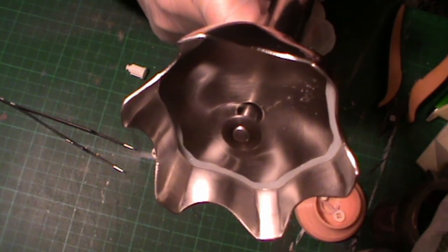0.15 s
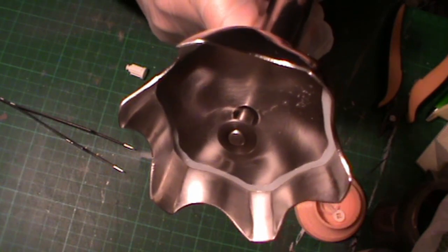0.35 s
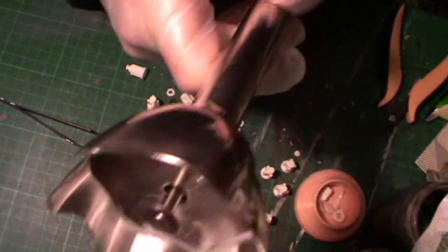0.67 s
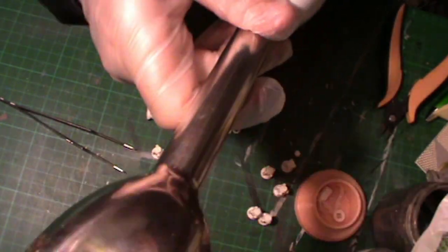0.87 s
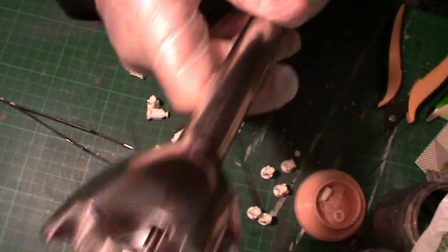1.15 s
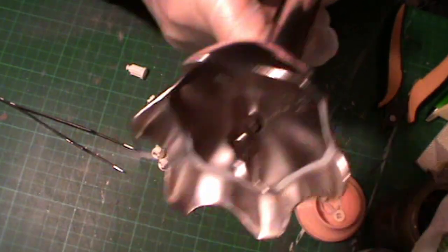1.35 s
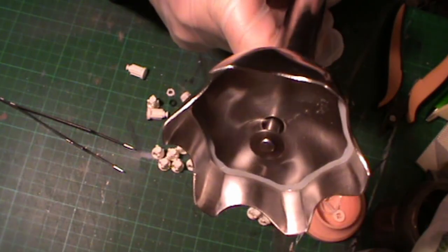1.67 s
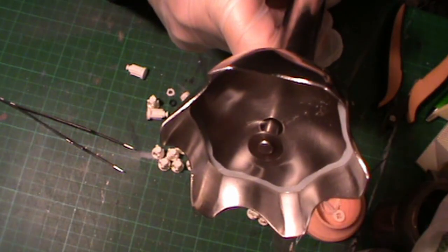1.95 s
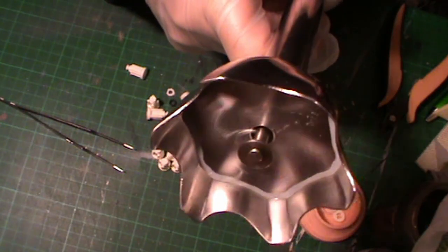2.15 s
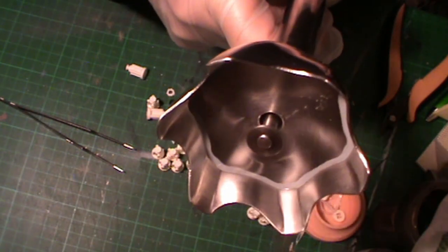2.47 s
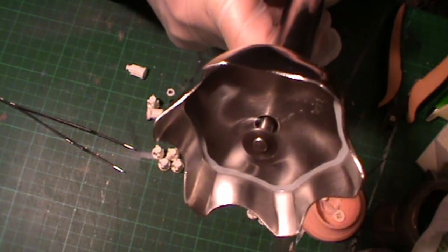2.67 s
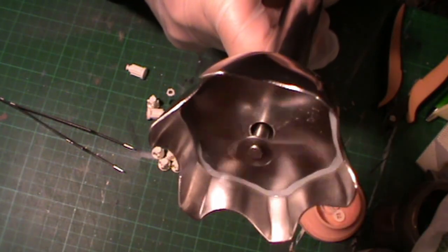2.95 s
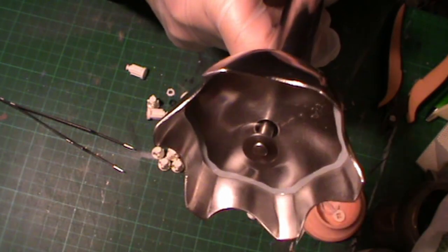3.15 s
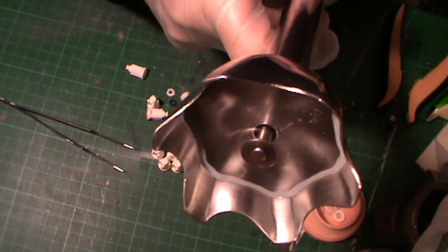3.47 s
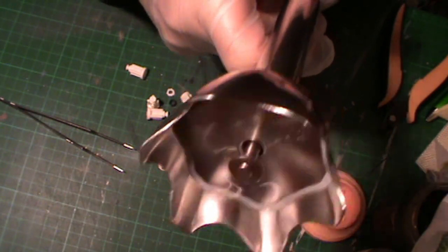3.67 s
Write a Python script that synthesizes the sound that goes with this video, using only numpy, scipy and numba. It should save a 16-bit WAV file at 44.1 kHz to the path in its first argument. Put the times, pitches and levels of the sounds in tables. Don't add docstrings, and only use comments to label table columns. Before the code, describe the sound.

A hand blender close to the microphone runs loudly at full speed, glides down in pitch and stops with a soft thud, then gives three short, rattly low-speed pulses in a small quiet room.

```python
import sys
import numpy as np
from scipy import signal
from scipy.fft import rfft, irfft
from scipy.io import wavfile
from scipy.ndimage import uniform_filter1d
from numba import njit

SR = 44100
rng = np.random.default_rng(int(sys.argv[2]) if len(sys.argv) > 2 else 0)


def log_audio(samples):
    frames = np.atleast_2d(samples).T
    limited = np.clip(frames, -1, 1)
    pcm = np.round(limited * 32767).astype(np.int16)
    wavfile.write(sys.argv[1], SR, pcm)


def gain_from_db(level_db):
    decades = np.asarray(level_db, float) / 20
    return 10 ** decades


N = 167580
T = np.arange(N) / SR

# on_s, off_s, shaft_hz, moment_of_one_knock_s, knock_db
PRESSES = [
    (1.7, 2.105, 50.23, 1.9925, 0),
    (2.411, 2.765, 50.65, 2.6268, -4),
    (3.153, 3.679, 51.13, 3.539, -3),
]


def level(x, db):
    return x * gain_from_db(db) / np.sqrt(np.mean(x ** 2))


@njit
def svf(x, hz, width):
    y, b, l = np.empty(len(x)), 0., 0.
    for i in range(len(x)):
        g, k = np.tan(np.pi * hz[i] / SR), width[i] / hz[i]
        v = (b + g * (x[i] - l)) / (1 + g * (g + k))
        b, l, y[i] = 2 * v - b, l + 2 * g * v, k * v
    return y


def band(x, hz, width):
    return svf(x, np.clip(hz + 0 * T, 10, .45 * SR), np.maximum(width + 0 * T, 1))


def hiss():
    return rng.standard_normal(N)


def walk(rate):
    k = int(SR / rate)
    steps = np.repeat(rng.standard_normal(N // k + 1), k)
    return 1.4 * uniform_filter1d(uniform_filter1d(steps, k), k)[:N]


def coloured(table):
    hz, db = np.array(table).T
    f = np.arange(N // 2 + 1) * SR / N + 1
    gain = gain_from_db(np.interp(np.log(f), np.log(hz), db, left=-60))
    return level(irfft(rfft(hiss()) * gain, N), 0)


def bump(centre_s, half_width_s):
    return np.exp(-((T - centre_s) / half_width_s) ** 2)


def motor():
    # shaft_hz, level_db
    effort = [(8, -64), (25, -42), (50, -37.5), (100, -29), (150, -25), (220, -17)]
    speed, turns, power, knock = shaft()
    octave = np.log2(np.maximum(speed, 1) / 220)
    press = np.searchsorted([p[0] for p in PRESSES], T)
    hz, db = np.array(effort).T
    loud = gain_from_db(np.interp(np.log(speed + 1), np.log(hz), db, left=-90))
    driven = commutator_tones(speed, turns, power, octave, press)
    driven = driven + commutator_ticks(speed, turns, octave)
    driven = driven + shaft_knocks(speed, turns, power, knock, octave, press)
    driven = driven + brush_hiss(power, octave) + bar_noise(speed, octave)
    return unbalance(speed, turns, octave) + mains_buzz(power) + loud * driven


def shaft():
    # time_s, shaft_hz
    coast = [(0, 193), (.116, 218), (.26, 220.5), (.476, 153.5), (.62, 119.5), (.78, 85.4), (.97, 54),
             (1.1, 36), (1.2, 23)]
    fast_stop_s, fast_off_s = 1.29, .27
    spin_up_s, coast_hz_per_s = .011, 128
    release_drop_hz, release_s = 6, .018
    at, hz = np.array(coast).T
    speed = np.interp(T, [*at, fast_stop_s], [*hz, 0])
    power = 1. * (T < fast_off_s)
    knock = np.full(N, gain_from_db(-3.0))
    for on, off, top, _, db in PRESSES:
        up = top * (1 - np.exp(-np.maximum(T - on, 0) / spin_up_s))
        since = np.maximum(T - off, 0)
        down = top - release_drop_hz * (1 - np.exp(-since / release_s)) - coast_hz_per_s * since
        speed = np.where(T > on, np.clip(np.minimum(up, down), 0, None), speed)
        power = power + (T > on) * (T < off)
        knock = np.where(T > on, gain_from_db(db), knock)
    turns = np.cumsum(speed) / SR
    for on, _, _, knock_s, _ in PRESSES:
        turns = np.where(T > on, turns - np.interp(knock_s, T, turns), turns)
    return speed, turns, uniform_filter1d(power, size=200), knock


def tone(multiple, turns):
    return np.sin(2 * np.pi * (multiple * turns + rng.random())) * np.sqrt(2)


def commutator_tones(speed, turns, power, octave, press):
    bar_multiples = [12, 24, 48, 72, 96, 120]
    # fast_run_db, press_1_db, press_2_db, press_3_db, powered_lift_db
    bar_levels = [(-22, -19, -19, -20, -2), (-19, -16, -16, -16, 1), (-26, -30, -29, -26, 3),
                  (-27, -23, -22, -20, -6), (-33, -26, -26, -24, -3), (-38, -29, -29, -25, 0)]
    out = np.zeros(N)
    for k, db in zip(bar_multiples, bar_levels):
        hz = k * speed
        gain_db = np.array(db)[press] + db[-1] * power + 1.8 * walk(28)
        gain_db = gain_db - 22 * np.maximum(octave + .8, 0)
        low_cut = 1 + (np.where(k > 12, 680, 420) / (hz + 1)) ** 8
        out += gain_from_db(gain_db) * tone(k, turns) * (hz < 11000) * housing(hz) / low_cut
    return out


def housing(hz):
    # centre_hz, width_hz, lift_db
    resonances = [(590, 100, 4), (830, 150, 10), (1220, 200, 10), (1800, 350, -4), (2300, 300, 9),
                  (2800, 260, 10), (3350, 250, -7), (4800, 2000, 9)]
    lift = sum(db / (1 + (2 * (hz - f) / w) ** 2) for f, w, db in resonances)
    return gain_from_db(lift) / (1 + (330 / (hz + 1)) ** 2)


def unbalance(speed, turns, octave):
    shakes = [-25.5, -36.5, -36, -34.5, -43, -34, -35, -41, -42, -39, -38]
    out = np.zeros(N)
    for k, db in enumerate(shakes, start=1):
        gain_db = db + flare(k) + 6 * octave * (2 < k < 10) + min(k, 1.6) * walk(20)
        out += gain_from_db(gain_db) * tone(k, turns) / (1 + (68 / (k * speed + 1)) ** 6)
    return gain_from_db(17 * octave) * out


def flare(multiple):
    # centre_s, half_width_s, shaft_multiple, swell_db
    swells = [(0, .05, 2, -12), (0, .05, 3, -9), (0, .06, 4, -11), (0, .07, 6, -9), (.05, .05, 7, 5),
              (.205, .045, 6, 11), (.255, .045, 4, 8), (.43, .05, 3, 5), (.3, .05, 6, -5), (.2, .05, 9, 6),
              (.33, .03, 3, -7), (.36, .045, 5, 14), (.4, .04, 8, 5), (.46, .04, 9, 9), (.51, .04, 6, 4),
              (.56, .07, 10, 9), (.61, .05, 11, 8), (.58, .025, 1, -5), (.68, .03, 1, 2), (.6, .12, 3, -6),
              (.8, .04, 11, 13), (.78, .03, 10, 12), (.92, .07, 11, 14)]
    return sum(db * bump(s, w) for s, w, k, db in swells if k == multiple)


def commutator_ticks(speed, turns, octave):
    tick = level(bell(ticks(turns, count=72, scatter_db=6.0, pattern_db=1.5)), -3.5)
    even = 1 / np.sqrt(np.maximum(speed, 12) / 50)
    return tick * even * gain_from_db(-3.0 * np.maximum(octave + 2, 0))


def passing(turns, count):
    k = np.floor(turns * count).astype(int)
    return k % count, np.diff(k, prepend=k[0]) == 1


def ticks(turns, count, scatter_db, pattern_db):
    place, arrives = passing(turns, count)
    own = gain_from_db(pattern_db * rng.standard_normal(count)) * rng.choice([-1, 1], count)
    return arrives * own[place] * gain_from_db(scatter_db * hiss())


def bell(x):
    # centre_hz, width_hz, level_db
    modes = [(593, 390, -4.5), (900, 80, 2.5), (1380, 212, 1), (2056, 180, -4), (2250, 174, -1.5),
             (2761, 135, 6), (3190, 59, 1.5), (3850, 260, -7), (4540, 940, -10.5), (5500, 120, -7.5),
             (6820, 87, -6.5), (8900, 2000, -19.5), (9300, 630, -12.5), (13200, 590, -40)]
    return sum((-1) ** k * gain_from_db(db) * band(x, f, w) for k, (f, w, db) in enumerate(modes))


def shaft_knocks(speed, turns, power, knock, octave, press):
    rub = rough_spots(turns, speed, size=160)
    whole = gain_from_db(-14) * bell(band(rub, 2200, 2200))
    low = gain_from_db(-13 + 4 * (press > 2)) * band(band(rub, 1480, 400), 1480, 900)
    high = band(band(rub, 2800, 300), 2800, 600)
    gain_db = -4 * octave + 4 * power - 3 - 3 * (press < 1)
    return level(whole + low + high, -12) * knock * gain_from_db(gain_db)


def rough_spots(turns, speed, size):
    place, arrives = passing(turns, size)
    turn = np.arange(size) / size
    rough = np.exp(-((turn - .06) / .07) ** 2) + gain_from_db(-14) * np.exp(-((turn - .6) / .15) ** 2)
    spot = rng.standard_normal(size) * rough
    flip_chance = .5 / (1 + (95 / (speed + 1)) ** 4)
    loose = np.where(rng.random(N) < flip_chance, -1, 1)
    return arrives * spot[place] * loose * gain_from_db(1.8 * walk(30) + 1.5 * hiss())


def brush_hiss(power, octave):
    # frequency_hz, level_db_per_hz
    spectrum = [(150, -55), (250, -14), (649, -42), (856, -5), (1170, -37), (1300, -9), (5370, 1.5),
                (12500, -7.5), (15700, -15.5)]
    # centre_hz, width_hz, level_db
    cavities = [(4780, 390, 0), (7450, 230, -13.5), (8110, 620, -6.5), (9330, 830, -1), (10260, 490, -5),
                (12660, 390, -4.5)]
    pulse = 1 + .5 * power * gain_from_db(-2.0 * (octave + 7.5)) * np.cos(2 * np.pi * 100 * T)
    brush = gain_from_db(-5 + 3 * octave + 0.5 * walk(120)) * pulse * coloured(spectrum)
    return brush + sum(gain_from_db(db) * band(brush, f, w) for f, w, db in cavities)


def bar_noise(speed, octave):
    air = band(band(hiss(), 24.37 * speed, 3.0 * speed), 13.0 * speed, 3.5 * speed)
    return level(air, -6) * gain_from_db(4.3 * octave + 0.9 * walk(250))


def mains_buzz(power):
    # frequency_hz, level_db
    harmonics = [(100, -57), (300, -65), (400, -53.5), (500, -61), (600, -59), (700, -56), (900, -59)]
    return power * sum(gain_from_db(db + 1.8 * walk(10)) * tone(f, T) for f, db in harmonics)


def clatter():
    # start_s, level_db, length_ms, brightness_db
    clacks = [(1.699, -16.5, 4.7, -14), (1.704, -13.5, 5.2, -4.5), (1.711, -20, 8.6, -4),
              (2.411, -15.5, 2.46, -28), (2.415, -16.5, 6.3, 4), (2.425, -19.5, 4.9, -1),
              (2.431, -19, 4.3, -22), (3.153, -23, 5.1, 8), (3.164, -29.5, 7.9, 5), (3.164, -20, 4.4, 14),
              (3.172, -20, 10.3, 1)]
    ring, crack = np.zeros(N), np.zeros(N)
    grit = hiss() * (rng.random(N) < .25)
    for s, db, ms, bright_db in clacks:
        u = np.maximum(T - s, 0) / (np.clip(ms, 2, 8) / 1000)
        ring += gain_from_db(db) * np.minimum(u / 0.3, 1) * np.exp(-u ** 2) * grit
        crack += gain_from_db(db + min(bright_db, 4)) * (u > 0) * np.exp(-u / .6) * grit
    bright = band(band(crack, 5200, 4600), 5800, 6000)
    return gain_from_db(15.5) * bell(ring) + gain_from_db(19.5) * band(ring, 3070, 160) + gain_from_db(5.5) * bright


def loose_knocks():
    # start_s, peak_db
    blows = [(1.1635, -30), (1.2335, -33), (1.238, -32), (2.265, -39), (2.329, -39), (2.787, -33),
             (2.874, -29), (2.879, -31), (2.904, -33), (2.913, -30), (2.923, -31), (2.953, -36),
             (2.965, -35), (2.981, -29), (3.008, -38), (3.783, -30)]
    hits = np.zeros(N)
    for s, db in blows:
        three = (1 + .3 * rng.standard_normal(3)) * rng.choice([-1, 1], size=3)
        hits[int(s * SR) + np.arange(0, 60, 20)] += gain_from_db(db) * three
    hits = band(hits, 2200, 2400)
    return 11 * band(hits, 2800, 260) + 8 * band(hits, 1550, 260) + 4 * band(hits, 2200, 400)


def thuds():
    # start_s, level_db, pitch_hz
    bumps = [
        (1.264, -26, 800),
        (1.597, -42, 374),
        (1.676, -43, 1250),
        (2.391, -40, 1200),
        (3.121, -41, 850),
    ]
    out, noise = np.zeros(N), hiss()
    for s, db, hz in bumps:
        burst = (T > s) * np.exp(-np.maximum(T - s, 0) / .008) * noise
        out += gain_from_db(db + 6) * band(band(burst, hz, 1.5 * hz), hz, 4 * hz)
    return out


def hand():
    # centre_s, half_width_s, level_db, pitch_hz
    gusts = [(.15, 0.11, -47, 54.7), (.33, 0.067, -35.5, 54.6), (.45, 0.032, -47, 80.6),
             (1.3, 0.087, -54, 63), (1.725, 0.044, -46, 80), (2.44, 0.04, -54, 97),
             (3.181, 0.0089, -55, 86.5)]
    # centre_s, half_width_s, level_db, centre_hz, width_hz
    rustles = [(1.32, 0.11, -57.5, 900, 900), (1.43, 0.02, -52.5, 900, 1390),
               (1.63, 0.066, -57.5, 348, 50.8), (1.62, 0.043, -58.5, 2880, 900), (2.3, 0.035, -75, 386, 80),
               (2.959, 0.14, -59, 381, 50), (3.05, 0.03, -53.5, 372, 40)]
    out = gain_from_db(-68 + 3 * walk(8)) * rumble(55)
    for s, w, db, hz in gusts:
        out += gain_from_db(db + 1.7 * walk(25.2)) * bump(s, w) * rumble(hz)
    for s, w, db, hz, wide in rustles:
        out += gain_from_db(1.5 * walk(59.7)) * bump(s, w) * level(band(hiss(), hz, wide), db)
    return out


def rumble(hz):
    return level(band(band(hiss(), hz, hz), hz, 1.6 * hz), 0)


def camera():
    # from_ms, to_ms
    step_times = [(0, 24), (22, 29), (31, 41), (0, 24), (20, 36), (20, 40)]
    # from_hz, to_hz, level_db
    step_tones = [(7330, 7020, -64), (6750, 6550, -67.5), (6300, 6120, -70), (3630, 3550, -65),
                  (3340, 3120, -64), (2370, 2330, -67)]
    frame_hz, frame_s = 25, 1.327
    ms = (T - frame_s) * frame_hz % 1 * 1000 / frame_hz
    fade = (ms > 20) * np.exp(-(ms - 20) / 6)
    out = gain_from_db(-60 + 2 * walk(20.8)) * fade * band(hiss(), 2600, 1200) * 4
    for (a, b), (hz0, hz1, db) in zip(step_times, step_tones):
        gate = uniform_filter1d(1. * (ms > a) * (ms < b), size=90)
        phase = 2 * np.pi * np.cumsum(np.interp(ms, [a, b], [hz0, hz1])) / SR
        out += gain_from_db(db + 2 * walk(21.3)) * gate * np.sin(phase) * np.sqrt(2)
    return out


def bench_echo(near):
    t60_s, echo_db = .15, -13
    t = T[:SR // 3]
    tail = rng.standard_normal(SR // 3) * np.exp(-np.log(1000) * t / t60_s) * (t > .003)
    tail = tail * gain_from_db(echo_db) / np.sqrt(np.sum(tail ** 2))
    return signal.fftconvolve(near, tail)[:N]


def room_hush():
    # frequency_hz, level_db_per_hz
    hush = [(53, -61), (90, -6), (117, -10), (151, -30), (243, -22), (565, -17.5), (3470, -21.5),
            (4210, -25), (15700, -27.5)]
    return gain_from_db(-56 + .8 * walk(9)) * coloured(hush)


def scene():
    near = motor() + clatter() + loose_knocks() + thuds()
    near = near + bench_echo(near)
    mono = near + hand() + camera() + room_hush()
    return np.array([mono, mono])


def low_pass(x):
    return signal.sosfilt(signal.butter(12, 15890, fs=SR, output="sos"), x)


def record(dry):
    top_cut = signal.ellip(12, .2, 70, 15690, fs=SR, output="sos")
    return low_pass(signal.sosfilt(top_cut, dry))


dry = scene()
out = record(dry)
log_audio(out)
```